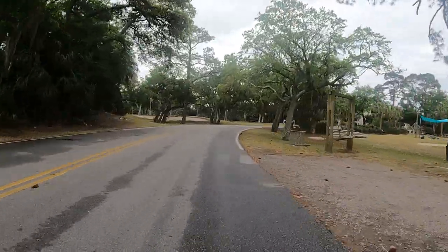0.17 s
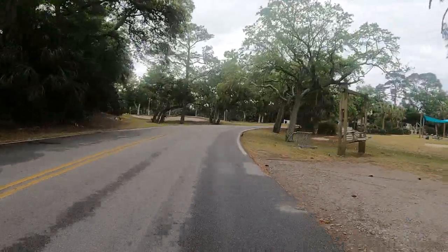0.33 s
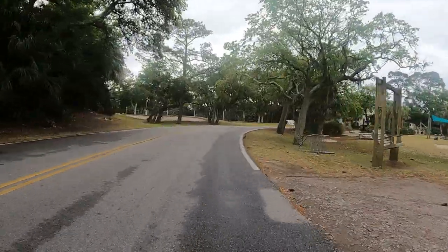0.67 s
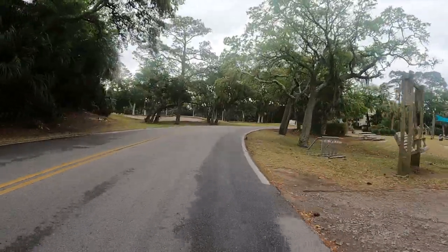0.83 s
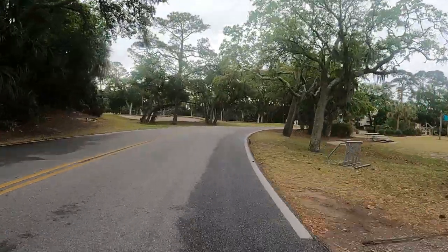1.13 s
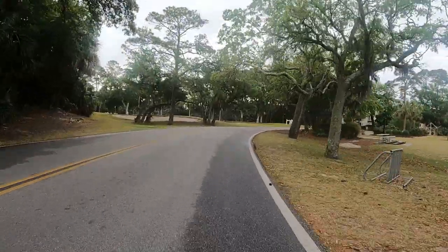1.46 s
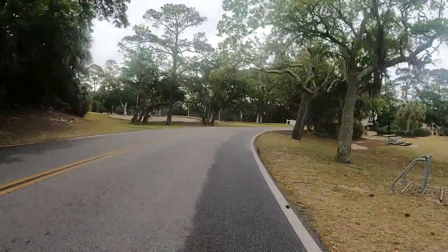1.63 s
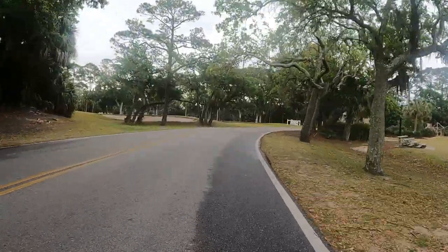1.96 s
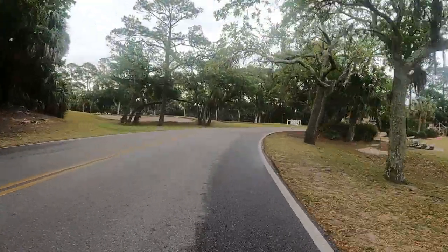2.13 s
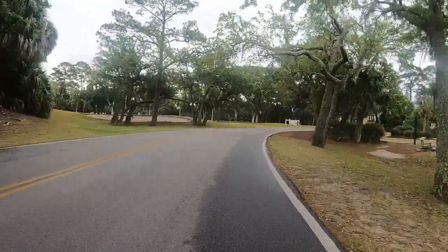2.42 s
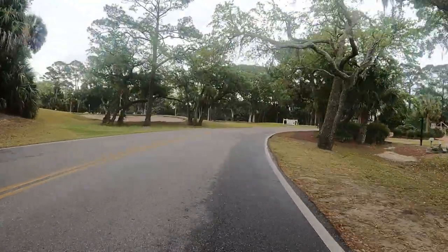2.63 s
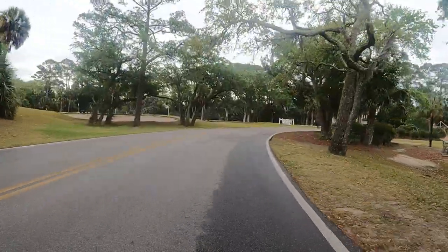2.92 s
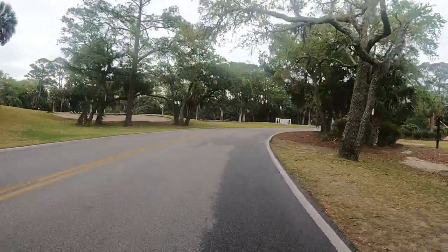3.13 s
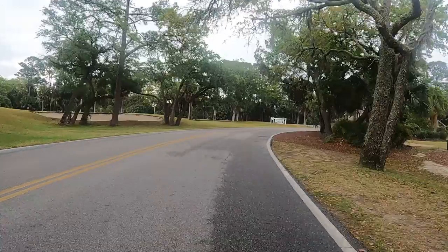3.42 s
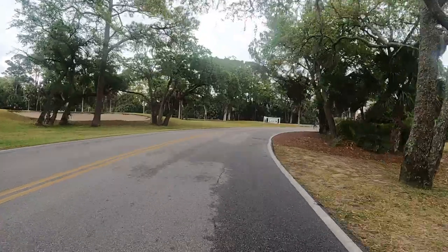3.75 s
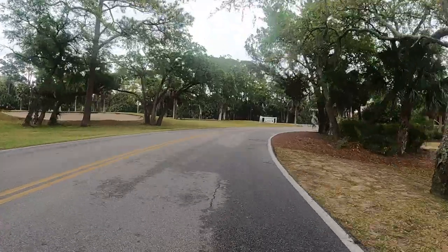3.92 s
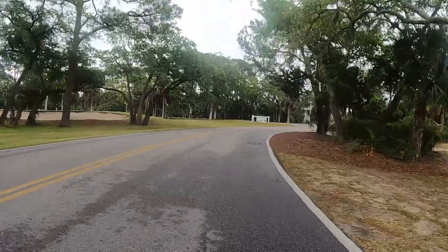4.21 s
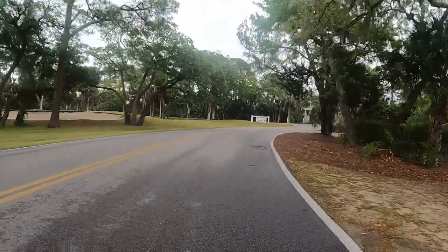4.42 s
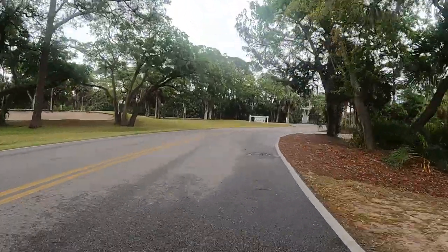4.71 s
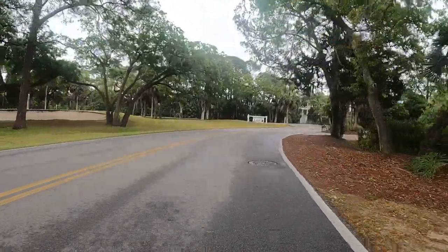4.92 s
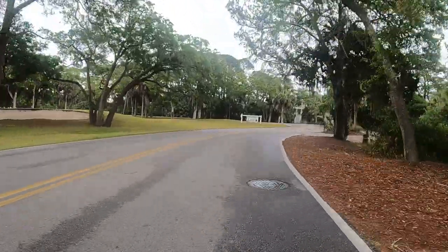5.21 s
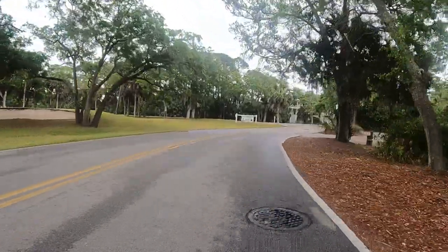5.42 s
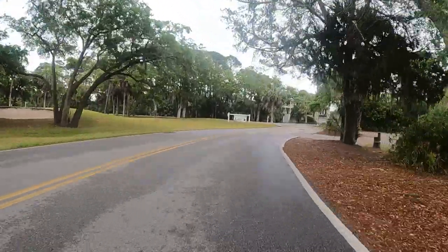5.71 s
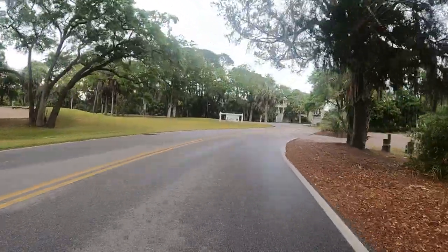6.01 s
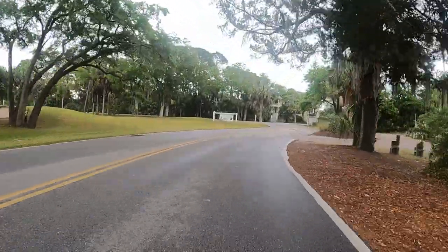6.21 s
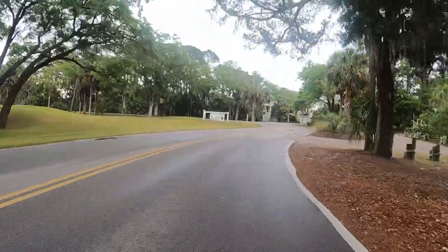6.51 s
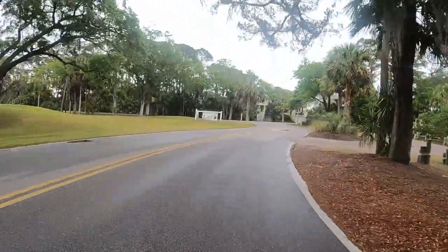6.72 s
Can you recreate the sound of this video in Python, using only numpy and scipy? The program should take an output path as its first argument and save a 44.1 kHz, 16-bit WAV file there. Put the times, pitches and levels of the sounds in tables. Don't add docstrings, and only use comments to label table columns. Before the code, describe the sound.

A small one-cylinder cart engine drones at a steady low pitch over tyre roar on asphalt, with faint ticking, hiss and soft wind thuds.

```python
import sys
import numpy as np
from scipy import signal
from scipy.io import wavfile

SR = 44100
rng = np.random.default_rng(int(sys.argv[2]) if len(sys.argv) > 2 else 0)


def store_wav(level_fs):
    pcm = np.round(np.clip(np.atleast_2d(level_fs), -1, 1) * 32767)
    wavfile.write(sys.argv[1], SR, pcm.T.astype(np.int16))


def decibels_to_gain(level_db):
    exponent = np.asarray(level_db, float) / 20
    return 10 ** exponent


N = 302956


def pulses(cycle, at, uneven_db, count=1):
    before = cycle[0] - (cycle[1] - cycle[0]) * np.arange(SR, 0, -1)
    turn = np.floor(count * (np.r_[before, cycle] - at))
    clicks = np.diff(turn, prepend=turn[0])
    return clicks * decibels_to_gain(uneven_db * rng.standard_normal(N + SR))


def soften(clicks, size):
    shape = np.hanning(size)
    return np.convolve(clicks, shape / shape.sum(), "same")


def ring(clicks, hz, t60):
    radius = decibels_to_gain(-60 / (t60 * SR))
    angle = 2 * np.pi * hz / SR
    poles = [1, -2 * radius * np.cos(angle), radius ** 2]
    return signal.lfilter([0, np.sin(angle)], poles, clicks + 1e-18)[-N:]


def pipes(cycle, sag):
    # f/Hz, level/dB, t60/s, push +1 or suck -1, column of the load tables
    exhaust = [(94.8, -14.5, .162, -1, 0), (174.8, -16.6, .317, -1, 1), (230.3, -16.1, .051, 1, 3)]
    intake = [(20.2, -19.1, .114, 1, 0), (128.1, -18.6, .5, -1, 1), (197.1, -23.8, .492, 1, 2)]
    unloaded_db = [1.07, 0.71, -1.26, 0.69]
    load_db_per_sag = [-11, 2, 27, 5.5]
    out = 0
    for modes, at in ((exhaust, .55), (intake, .126)):
        clicks = soften(pulses(cycle, at, uneven_db=0.72), size=70)
        for hz, level_db, t60, sign, column in modes:
            load_db = unloaded_db[column] + load_db_per_sag[column] * sag
            out = out + sign * decibels_to_gain(level_db + load_db) * ring(clicks, hz, t60)
    return out


def timing_gear(cycle):
    # f/Hz, level/dB, t60/s
    casing_modes = [(718, -63.5, 0.076), (1163, -53.5, .08), (1302, -50, .06), (1608, -62.5, 0.089)]
    # f/Hz, level/dB, t60/s
    cover_modes = [(413, -43.5, 0.22), (672, -41, .1), (1300, -34.5, .03), (2295, -57, 0.09)]
    teeth = soften(pulses(cycle, .28, uneven_db=4.5, count=6), size=9)
    valve = soften(pulses(cycle, .27, uneven_db=3.5), size=9)
    casing = sum(decibels_to_gain(level_db) * ring(teeth, hz, t60) for hz, level_db, t60 in casing_modes)
    cover = sum(decibels_to_gain(level_db) * ring(valve, hz, t60) for hz, level_db, t60 in cover_modes)
    return casing + cover


def rms_one(x):
    return x / np.sqrt(np.mean(x ** 2) + 1e-20)


def drift(rate):
    r = np.exp(-80 * np.pi * rate / SR)
    slow = signal.lfilter([1], [1, -2 * r, r * r], rng.standard_normal(N // 40 + 2002))[2000:]
    return np.interp(np.arange(N) / 40, np.arange(len(slow)), rms_one(slow))


def banded_noise(spectrum, patchy_db, low_hz, octaves, step=1 / 4):
    edges = low_hz * 2 ** np.arange(0, octaves, step)
    white = rng.standard_normal((2, N + SR // 2))
    together = drift(3.8)
    hz, level_db = np.transpose(spectrum)
    out = 0
    for k, (low, high) in enumerate(zip(edges, np.minimum(edges[1:], .47 * SR))):
        sos = signal.butter(2, [low, high], "band", fs=SR, output="sos")
        band = signal.sosfilt(sos, white[k % 2])[-N:]
        centre_db = np.interp(np.log(low * high) / 2, np.log(hz), level_db)
        flicker_db = patchy_db * (0.63 * together + drift(7.6))
        out = out + decibels_to_gain(centre_db + flicker_db) * band
    return rms_one(out)


def narrow_noise(low_hz, high_hz):
    sos = signal.butter(2, [low_hz, high_hz], "band", fs=SR, output="sos")
    return rms_one(signal.sosfilt(sos, rng.standard_normal(N + SR))[-N:])


def swells(s, height, half_s):
    t = np.arange(N) / SR
    return sum(h * np.exp(-((t - at) / w) ** 2) for at, h, w in np.broadcast(s, height, half_s))


def road_roughness():
    # t/s, extra level/dB, half length/s
    rough = [(0.1, -1.4, .12), (0.48, 1.9, 0.2), (0.917, 0.3, .05), (1.5, 0, .05), (1.83, 0.2, .04),
             (2.176, 0.2, 0.057), (2.937, 1.1, 0.036), (3.998, -0.3, 0.22), (4.83, 0.7, .04),
             (5.93, 1.3, .1), (6.6, -0.1, 0.14)]
    return swells(*np.transpose(rough))


def body_and_tyres(cycle, sag, road_db):
    # f/Hz, level/(dB per Hz)
    drone_spectrum = [(40, -30), (62, -5), (75, -6.5), (103, 0.5), (125, -2.5), (150, -6.5), (207, 0.9),
                      (250, 0.84), (293, -2), (348, -4.5), (414, -10.5), (490, -16.5), (800, -50)]
    # f/Hz, level/(dB per Hz)
    roar_spectrum = [(250, -28), (470, -2.5), (590, 0.45), (830, -2.5), (1000, -4.5), (1095, -7.5),
                     (1190, -5.5), (1370, -6), (1650, -12), (1950, -14), (2740, -17.5), (2950, -23),
                     (4300, -34), (7000, -51)]
    swell_db = 1.1 * np.cos(2 * np.pi * (cycle - .35))
    drone_db = -26 + 0.82 * road_db + swell_db
    roar_db = -34.5 + road_db - 4.5 * sag
    drone = decibels_to_gain(drone_db) * banded_noise(drone_spectrum, 0.55, 40.18, octaves=4.4)
    roar = decibels_to_gain(roar_db) * banded_noise(roar_spectrum, 0.33, 248.7, octaves=4.3, step=1 / 6)
    return drone + roar


def gas_hiss(cycle, road_db):
    # f/Hz, level/(dB per Hz)
    hiss_spectrum = [(2000, -26.5), (3400, 0.5), (4600, -0.5), (5400, -3), (6200, -3), (8000, -10),
                     (9000, -11.5), (9900, -21), (10700, -17.5), (11400, -26.5), (12400, -19),
                     (13500, -24.5), (14500, -29.5), (16000, -31)]
    since = (cycle - .95) % 1
    puff_db = 3.0 * np.minimum(since / .07, 1) * np.exp(-since / .36)
    hiss_db = -57.5 + .8 * road_db + puff_db
    leak_db = -86.5 + 4.0 * puff_db
    hiss = decibels_to_gain(hiss_db) * banded_noise(hiss_spectrum, .3, 2000, octaves=3.2, step=1 / 6)
    return hiss + decibels_to_gain(leak_db) * narrow_noise(11950, 12800)


def wobbles(s, level_db, hz, half_s):
    t = np.arange(N) / SR
    turns = rng.random(len(s))
    out = 0
    for at, db, f, turn in np.broadcast(s, level_db, hz, turns):
        bell = swells(at, decibels_to_gain(db) * np.sqrt(2), half_s)
        out = out + bell * np.sin(2 * np.pi * (f * (t - at) + turn))
    return out


def wind_and_bumps():
    # t/s, level/dB
    bump_rows = [(0.4, -27), (0.68, -27), (0.84, -18), (1.19, -27), (1.4, -29), (1.55, -26), (1.67, -29),
                 (1.92, -23), (2.25, -32), (2.7, -32), (2.98, -28), (3.8, -30), (5.1, -29), (5.43, -29),
                 (5.9, -30), (6.1, -19), (6.48, -23)]
    # t/s, level/dB, f of the wobble/Hz
    gust_rows = [(0.02, -51, 55), (0.19, -19, 44), (0.38, -26, 62.4), (0.75, -32, 40), (1.22, -27, 50),
                 (1.53, -30, 45), (1.92, -29.5, 34), (3.0, -32, 36), (3.8, -29, 30), (4.14, -29, 50),
                 (4.6, -27, 50), (5.4, -29, 34), (5.75, -30, 41.8), (5.871, -28, 48), (5.97, -27, 62),
                 (6.002, -19, 95), (6.829, -31, 50)]
    thud = decibels_to_gain(-32) * narrow_noise(12.0, 24)
    buffet = decibels_to_gain(-35.5) * narrow_noise(29, 68)
    bumps = wobbles(*np.transpose(bump_rows), hz=19.0, half_s=.06)
    gusts = wobbles(*np.transpose(gust_rows), half_s=0.055)
    return thud + buffet + bumps + gusts


def scene():
    # t/s, rate/(cycles per s)
    speed_curve = [(0.0, 24.408), (0.74, 24.345), (0.98, 24.395), (1.23, 24.335), (1.96, 24.3),
                   (2.21, 24.36), (2.94, 24.372), (3.44, 24.35), (3.93, 24.3), (4.42, 24.275), (4.91, 24.3),
                   (5.4, 24.318), (5.89, 24.14), (6.87, 24.088)]
    speed = np.interp(np.arange(N) / SR, *np.transpose(speed_curve))
    cycle = .096 + np.cumsum(speed) / SR
    sag = 24.4 - speed
    road_db = road_roughness()
    engine = pipes(cycle, sag) + timing_gear(cycle)
    rolling = body_and_tyres(cycle, sag, road_db) + gas_hiss(cycle, road_db)
    return (engine + rolling + wind_and_bumps())[None]


def low_pass(x):
    return signal.sosfilt(signal.butter(12, 15760, fs=SR, output="sos"), x)


def record(dry):
    x = signal.sosfilt(signal.butter(1, 4, "high", fs=SR, output="sos"), dry)
    x = x - .3 * signal.lfilter(*signal.iirpeak(11500, 18, SR), x)
    left_s = np.arange(N, 0, -1) / SR
    closing = np.minimum(.35 + left_s / .002, 1)
    x = x * np.sin(np.pi / 2 * closing) ** 2
    return low_pass(0.81 * np.tanh(x / 0.79))


dry = scene()
out = record(dry)
store_wav(out)
```